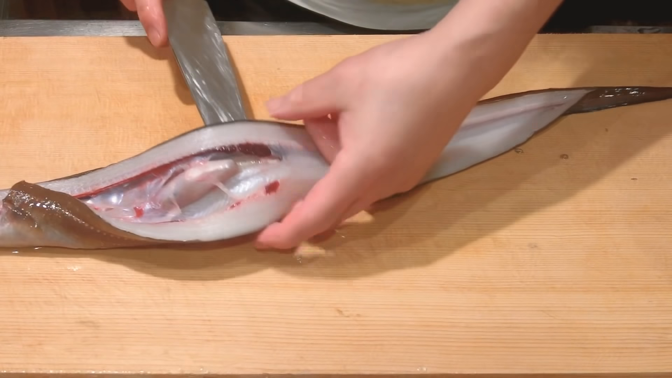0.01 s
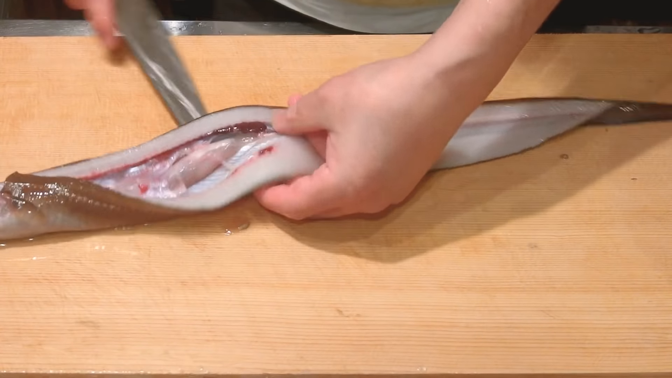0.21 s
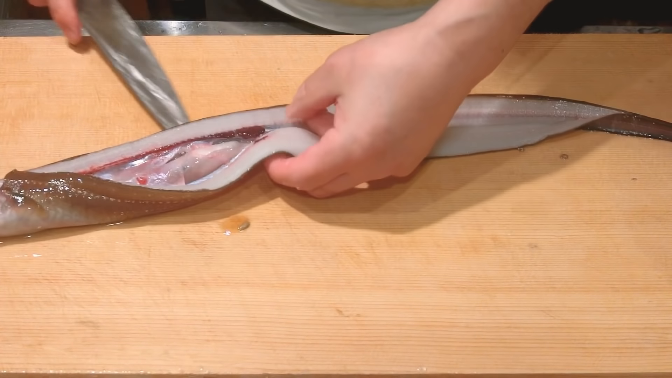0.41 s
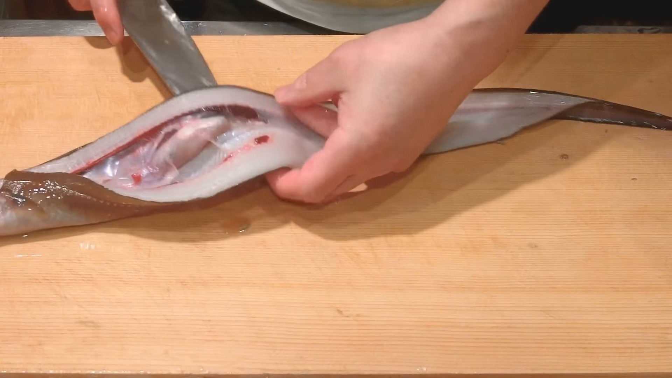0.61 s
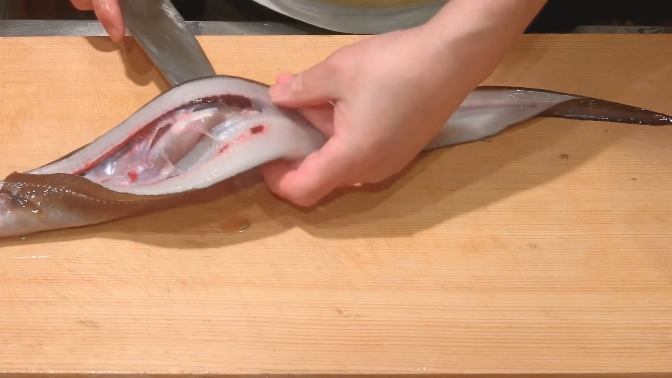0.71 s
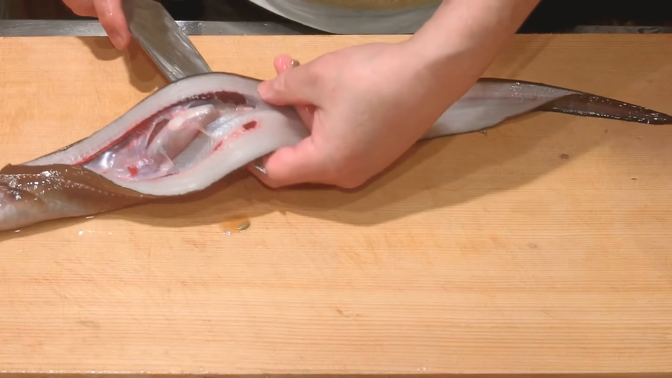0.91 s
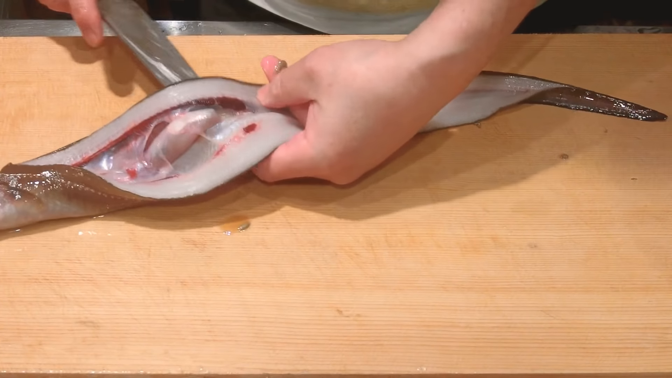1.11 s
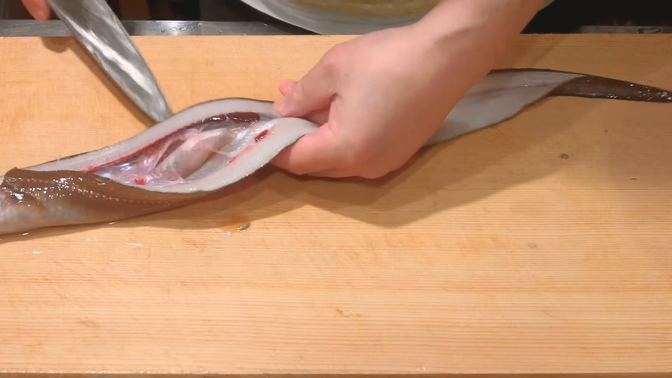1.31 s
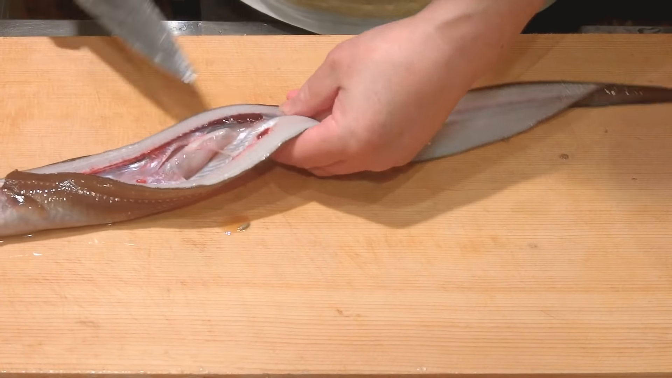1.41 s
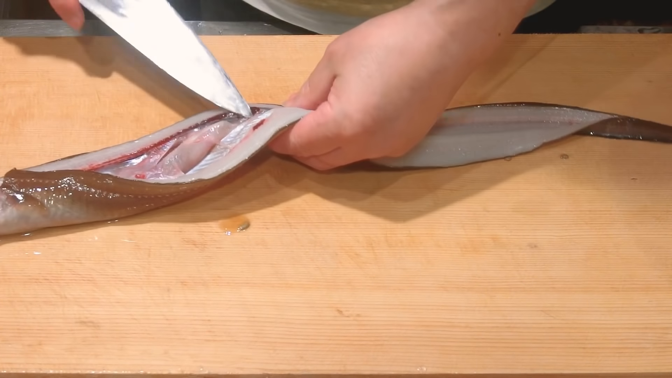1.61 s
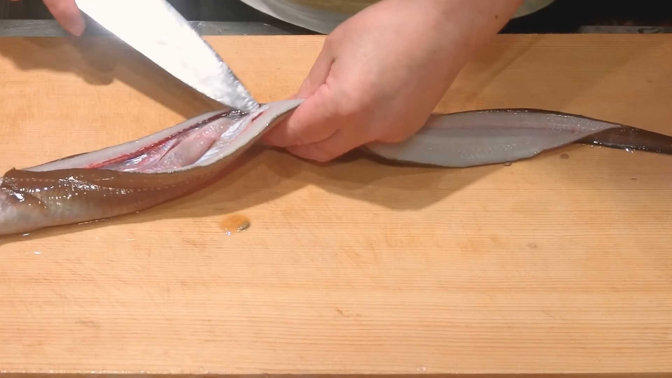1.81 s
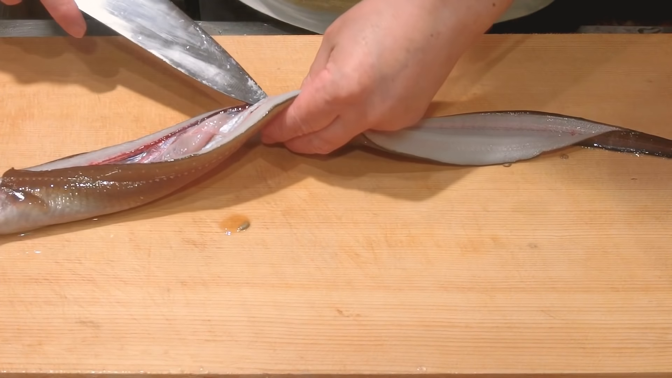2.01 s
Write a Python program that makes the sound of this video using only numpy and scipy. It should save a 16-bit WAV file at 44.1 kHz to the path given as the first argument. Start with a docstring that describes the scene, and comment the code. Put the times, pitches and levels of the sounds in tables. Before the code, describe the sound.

Close stereo pickup in a small quiet kitchen: one crisp knife-on-wood knock with a tight rattle of rebounds, then soft hand rubs on wet fish, a thin bright tick, low vehicle drone outside and hiss.

```python
"""A knife knocks once on a wooden board in a quiet kitchen: six fast blows ring modes of board, blade
and worktop, and sparse decaying taps make the small room. A hand brushes wet fish skin (swelling
band noise), wet ticks snap (clicks in wide resonances), a fan hums (noise in narrow resonances).
A vehicle outside drones in sine orders with dull road noise and a low rumble, over room air and the
hiss of a two-port microphone (shaped noise)."""
import sys
import numpy as np
from scipy import signal
from scipy.fft import rfft, irfft
from scipy.io import wavfile
from scipy.ndimage import uniform_filter1d

SR = 44100
rng = np.random.default_rng(int(sys.argv[2]) if len(sys.argv) > 2 else 0)


def master_out(mix):
    """Clip the mix to full scale and print it as 16-bit PCM to the path in sys.argv[1]."""
    frames = np.transpose(np.atleast_2d(mix))
    ceiling = np.clip(frames, -1, 1)
    pcm = np.round(ceiling * 32767).astype(np.int16)
    wavfile.write(sys.argv[1], SR, pcm)


def to_linear_factor(level_db):
    """Convert decibel levels (scalar or array-like) to linear amplitude factors."""
    exponent = np.asarray(level_db, float) / 20
    return 10 ** exponent


N = 92610  # length in samples, 2.1 s


def evened(x):
    """Brings a signal to an rms of 1."""
    return x / np.sqrt(np.mean(x ** 2) + 1e-20)


def read(points, hz):
    """Reads a table of (pitch_hz, value) along a log frequency axis."""
    f, value = np.transpose(points)
    return np.interp(np.log(hz + 1), np.log(f + 1), value)


def colour(x, points):
    """Filters by a table of (pitch_hz, gain_db)."""
    gain_db = read(points, np.fft.rfftfreq(len(x), 1 / SR))
    return irfft(rfft(x) * to_linear_factor(gain_db), len(x))


def resonate(x, hz, width):
    """A resonance of gain 1: shifts its pitch down to zero, smooths, and shifts back."""
    turn = np.exp(2j * np.pi * hz * np.arange(len(x)) / SR)
    r = np.exp(-np.pi * width / SR)
    return 2 * (turn * signal.lfilter([1 - r], [1, -r], x / turn)).real


def resonate_twice(x, hz, width):
    """Two equal resonances in a row, for steeper skirts."""
    return resonate(resonate(x, hz, width), hz, width)


def highpass(x, order, hz):
    """Butterworth low cut."""
    return signal.sosfilt(signal.butter(order, hz, "high", fs=SR, output="sos"), x)


def air():
    """Room air and microphone hiss as mid and side noise, with drifting patches and a slow swell."""
    # spectrum of the air and hiss, before the overall level: pitch_hz, level_db
    air_spectrum = [(25, -20.5), (60, -12.5), (85, -35), (130, -29), (175, -13), (236, -18), (394, -10),
                    (560, -10.5), (700, -8.5), (911, -14), (1290, -16.5), (3000, -22), (6000, -30),
                    (15100, -27.5), (15500, -66)]
    # stereo width of the air: pitch_hz, side_to_mid_db
    air_width = [(60, -10), (130, -6.5), (290, -6), (640, -10), (1410, -4.5), (3100, -2.5), (6820, 2.5),
                 (15000, -1.5)]
    level_db, patch_rms_db, swell_rms_db = -60.5, 1.2, 0.25
    frames, hz = N // 256 + 5, np.fft.rfftfreq(1024, 1 / SR)
    a, b, c, d, patches = rng.standard_normal((frames, 513, 5)).T
    # smooth over frequency, then over time
    patches = evened(uniform_filter1d(uniform_filter1d(patches, 10, 0), 12, 1))
    t = np.arange(frames) * 256 / SR
    swell_hz = np.geomspace(1.5, 8, 20)
    swell = evened(sum(np.sin(2 * np.pi * (f * t + rng.random())) / np.sqrt(f) for f in swell_hz))
    z = np.array([a + 1j * b, (c + 1j * d) * to_linear_factor(read(air_width, hz))[:, None]])
    z = z * to_linear_factor(read(air_spectrum, hz)[:, None] + patch_rms_db * patches + swell_rms_db * swell)
    out = signal.istft(z, nperseg=1024, noverlap=768)[1][:, :N]
    return to_linear_factor(level_db) * out / out[0].std()


def fan():
    """Wavering tones: noise in narrow resonances, its swells partly levelled."""
    # fan tones: pitch_hz, width_hz (of each resonance), level_db (rms)
    fan_tones = [(352.2, 43, -75), (394, 11.7, -73.5), (474.4, 14, -76), (532.7, 24, -73),
                 (618, 5.6, -67.5), (704.3, 62, -71.5), (847, 18, -76.5), (932, 20.5, -72)]
    noise, out = rng.standard_normal(2 * N), 0
    for hz, width, db in fan_tones:
        tone = evened(resonate_twice(noise, hz, width)[N:])  # the first half lets it settle
        levelled = tone / np.sqrt(abs(uniform_filter1d(tone ** 2, 3000)) + 0.56)
        out = out + to_linear_factor(db) * evened(levelled)
    return out


def rumble():
    """A low, nearly steady tone from resonated, levelled noise, which comes and goes."""
    # level curve of the rumble: time_s, level_db
    rumble_curve = [(0.0, -80), (0.29, -71), (0.33, -72), (0.41, -68), (0.78, -87.5), (0.81, -70),
                    (1.01, -88), (1.99, -76), (2.01, -78), (2.1, -84)]
    pitch_hz, width_hz = 68, 22
    s, db = np.transpose(rumble_curve)
    tone = resonate_twice(rng.standard_normal(N), pitch_hz, width_hz)
    tone = tone / np.sqrt(abs(uniform_filter1d(tone ** 2, 3000)) + 0.1 * tone.var())
    return to_linear_factor(np.interp(np.arange(N) / SR, s, db)) * tone


def road():
    """Dull tyre and exhaust noise, resonated low, that swells as the vehicle passes."""
    # road wash around the engine: middle_s, half_length_s, level_db (at the middle), pitch_hz, width_hz
    road_wash = (0.9, 1.18, -69, 169, 101)
    middle_s, half_length_s, level_db, pitch_hz, width_hz = road_wash
    wash = evened(resonate_twice(rng.standard_normal(N), pitch_hz, width_hz))
    swell = np.exp(-((np.arange(N) / SR - middle_s) / half_length_s) ** 4)
    return to_linear_factor(level_db) * swell * wash


def engine():
    """Low firing orders, sines on multiples of a moving pitch, heard through the wall."""
    # passing engine: time_s, firing_hz, level_db (rms of the third order)
    engine_curve = [(0.44, 56.16, -75), (0.556, 56.54, -64.5), (0.588, 54.55, -106), (0.674, 59.4, -54.5),
                    (0.696, 60.9, -88), (0.764, 49.6, -62.5), (0.832, 47, -69), (1.006, 53.17, -65),
                    (1.178, 53.76, -63.5), (1.192, 54.0, -63.5), (1.366, 51.65, -65), (1.402, 51.36, -77.5),
                    (1.508, 56, -69), (1.576, 57.4, -74), (1.626, 58.2, -65.5), (1.67, 57.2, -93),
                    (1.702, 59.4, -68), (1.72, 59.1, -71)]
    # balance of the orders: multiple of the firing rate, level_db (against the third)
    order_levels = [(1, -22), (2, -10), (3, 0), (4, -14.5)]
    s, hz, db = np.transpose(engine_curve)
    t = np.arange(N) / SR
    turns = np.cumsum(np.interp(t, s, hz)) / SR
    orders = 0
    for multiple, order_db in order_levels:
        orders = orders + to_linear_factor(order_db) * np.sin(2 * np.pi * (multiple * turns + rng.random()))
    # 80 dB per second of fade outside the curve
    fade_db = -80 * (np.clip(s[0] - t, 0, None) + np.clip(t - s[-1], 0, None))
    return np.sqrt(2) * to_linear_factor(np.interp(t, s, db) + fade_db) * orders


def brushes():
    """A hand brushing skin: soft band-limited friction noise that swells and fades."""
    # strokes: start_s, rise_s, fall_s, level_db (rms at the crest), low_hz, high_hz
    strokes = [(.002, 0.017, 1, -67, 1470, 4440), (.46, .16, 0.14, -63, 1200, 4800),
               (0.514, 0.0064, 0.032, -61, 3000, 15000), (1.35, .15, 0.14, -69, 1500, 4200),
               (1.85, 0.074, 0.064, -72, 1520, 5500)]
    t, out = np.arange(N) / SR, np.zeros(N)
    for s, rise, fall, db, low_hz, high_hz in strokes:
        swell = np.clip((t - s) / rise, 0, 1) ** 2
        fade = np.exp(-np.clip((t - s - rise) / fall, 0, None) ** 2)
        band = signal.butter(2, [low_hz, high_hz], "band", fs=SR, output="sos")
        friction = evened(signal.sosfilt(band, rng.standard_normal(N)))
        out += to_linear_factor(db) * swell * fade * friction
    return out


def clicks(rows):
    """Single-sample impulses at the times and levels of the blows."""
    out = np.zeros(N)
    for s, db in rows:
        out[round(s * SR)] += to_linear_factor(db)
    return out


def rings(modes, t, rise_s, damping):
    """Decaying sine modes with a linear onset; damping is the share of ring time kept."""
    total = 0
    for hz, db, t60 in modes:
        total = total - to_linear_factor(db - 60 * t / t60 / damping) * np.sin(2 * np.pi * hz * t)
    return np.minimum(t / rise_s, 1) * total / 4


def knock(blows, damping=1):
    """Each blow rings board, blade and the slower worktop, with a short bright noise crack."""
    # modes of the board, the blade and the worktop under it: pitch_hz, level_db (relative),
    # t60_s (at damping 1)
    board_modes = [(1150, -20, 0.029), (1173, 10, 0.018), (1362, -9, 0.038), (1808, 3.5, 0.03),
                   (1960, 7.5, 0.01), (2136, -2.5, .025), (2690, -18, 0.014), (2604, -4.5, 0.083),
                   (2816, -1.5, 0.024), (3182, 0, 0.042), (3230, -10, 0.049)]
    blade_modes = [(4317, -4, 0.027), (4870, -26.5, .02), (4760, -7.5, 0.045), (5330, -17.5, 0.044),
                   (5924, -7, 0.027), (6170, -31, .03), (7090, -19, 0.067), (7540, -43, 0.04),
                   (9383, -28, 0.044), (11560, -19.5, 0.043), (11870, -20, 0.026), (12580, -21, 0.034),
                   (13810, -34, .03), (14585, -13.5, .07)]
    worktop_modes = [(137.4, -30.5, 0.28), (158, -29, 0.16), (222, -25.5, 0.076), (275, -32, 0.28),
                     (344.8, -19, 0.28), (450, -3.5, 0.13), (510.8, -8, 0.22), (634, -10, 0.049),
                     (770, -21, 0.096), (826, -22, 0.19)]
    contact_s, worktop_rise_s = 0.00023, 0.007
    crack_db, crack_t60_s = -19, 0.02
    t = np.arange(SR // 3) / SR
    crack = highpass(rng.standard_normal(len(t)), 2, 5500)
    crack = to_linear_factor(crack_db - 60 * t / crack_t60_s) * crack
    bright = highpass(rings(board_modes + blade_modes, t, contact_s, damping) + crack, 3, 450)
    bright = signal.sosfilt(signal.cheby2(8, 30, 15700, fs=SR, output="sos"), bright)  # steep top cut
    worktop = rings(worktop_modes, t, worktop_rise_s, damping)
    return signal.fftconvolve(clicks(blows), bright + worktop)[:N]


def room(x):
    """Sparse reflections dying band by band; a second set of taps makes the side signal."""
    # decay of the room: pitch_hz, t60_s
    room_decay = [(150, 0.51), (500, 0.21), (2000, 0.25), (6000, 0.23), (14000, 0.27)]
    # stereo width of the room: pitch_hz, side_to_mid_db
    room_width = [(60, -18), (180, -20), (550, -20), (1650, -15.5), (4970, 1.5), (15000, -1)]
    level_db, delay_s = -4.5, 0.0033
    taps = np.zeros((2, SR // 2))
    first = round(delay_s * SR)
    # one tap of random sign somewhere in every 16 samples
    slots = np.arange(first, SR // 2 - 16, 16)
    at = slots + rng.integers(0, 16, (2, len(slots)))
    np.put_along_axis(taps, at, rng.choice([-1., 1.], (2, len(slots))), 1)
    hz, t, z = signal.stft(taps, SR, nperseg=256)
    decay = to_linear_factor(-60 * t / read(room_decay, hz)[:, None])
    tail = signal.istft(z * decay, SR, nperseg=256)[1]
    tail[:, :first] = 0
    tail = tail / np.linalg.norm(tail[0])
    mid, side = signal.fftconvolve(x[None], tail, axes=1)[:, :N]
    return to_linear_factor(level_db) * np.array([mid, colour(side, room_width)])


def ticks():
    """Tiny wet snaps: a click through a steep, wide resonance."""
    # snaps: start_s, level_db (peak, before the common trim), pitch_hz, width_hz (of each resonance)
    snaps = [(.5215, -52, 3600, 900), (1.2058, -37, 11000, 1500), (1.2059, -43, 11500, 9000),
             (1.2062, -52, 2900, 700), (1.632, -53, 500, 600), (1.942, -53, 700, 900)]
    trim_db = -0.5
    out = np.zeros(N)
    click = np.eye(1, 400)[0]
    for s, db, hz, width in snaps:
        snap = resonate_twice(click, hz, width)
        at = round(s * SR)
        out[at:at + 400] += to_linear_factor(db) * snap / abs(snap).max()
    return to_linear_factor(trim_db) * out


def scene():
    """Sums the close sounds, their room and the background as mid and side, then left and right."""
    # the knock lands as a blow and quick rebounds: start_s, level_db (relative)
    blow_times = [(.2133, -6), (.2141, -14), (.2147, -8), (.2163, -17.5), (.218, -20), (.22, -24.5)]
    # the knock leans left, more in the treble: pitch_hz, side_to_mid_db
    knock_pan = [(300, -28), (3000, -37), (6000, -9), (11000, -19), (14500, -4)]
    hit, snaps = knock(blow_times), ticks()
    # the room hears only the first blow, its modes damped to 0.6 of their ring time, 5 dB up
    room_knock = to_linear_factor(5) * knock(blow_times[:1], 0.6)
    sent = highpass(room_knock + snaps, 2, 800)  # the lows stay almost dry
    mid, side = room(sent) + air()
    brushing = brushes()
    background = fan() + engine() + rumble() + road()
    mid = mid + hit + snaps + brushing + background
    side = side + colour(hit, knock_pan) + 0.2 * snaps + 0.15 * brushing
    side = side + 0.062 * np.roll(background, 90)  # a slightly late copy widens the hum
    return np.array([mid + side, mid - side])


def roll_off(x):
    """The treble ends steeply here."""
    return signal.sosfilt(signal.butter(12, 16930, fs=SR, output="sos"), x)


def record(dry):
    """Delivers the finished mix."""
    return roll_off(dry)


dry = scene()
out = record(dry)
master_out(out)
```